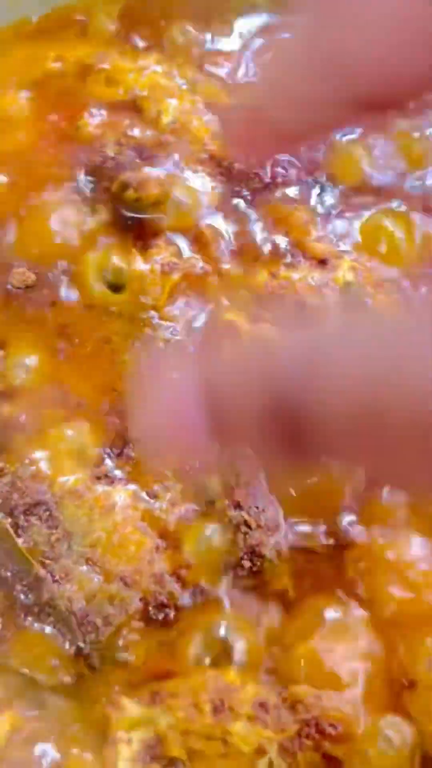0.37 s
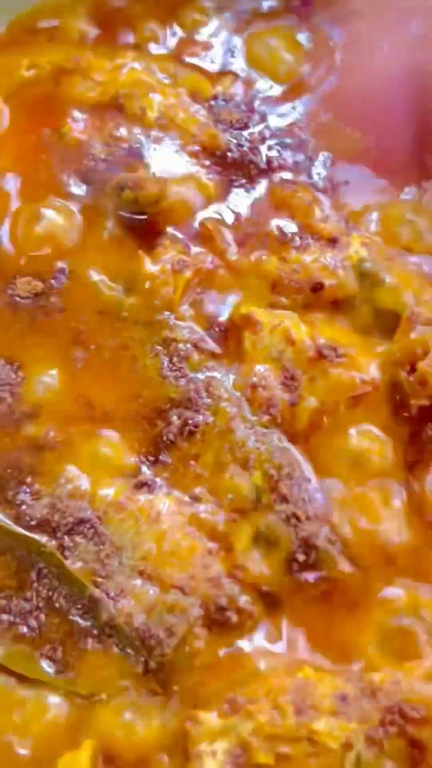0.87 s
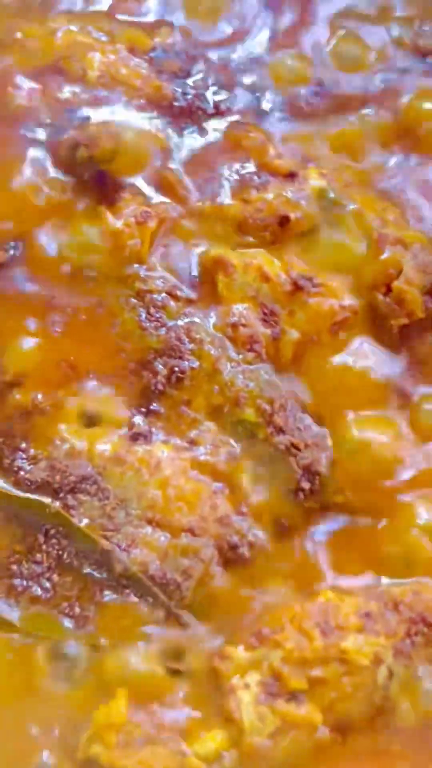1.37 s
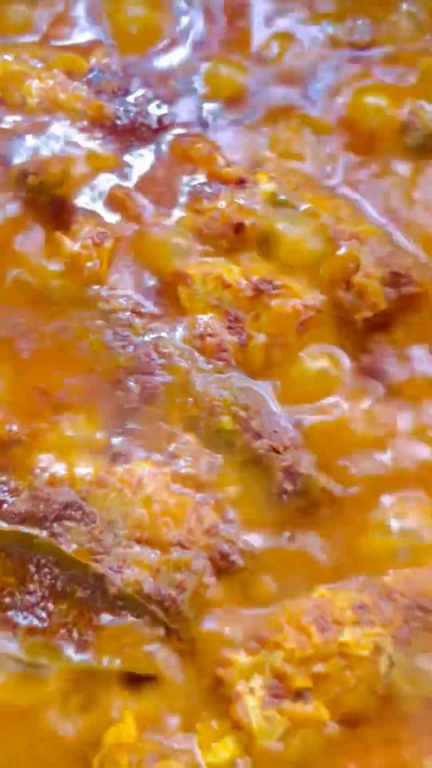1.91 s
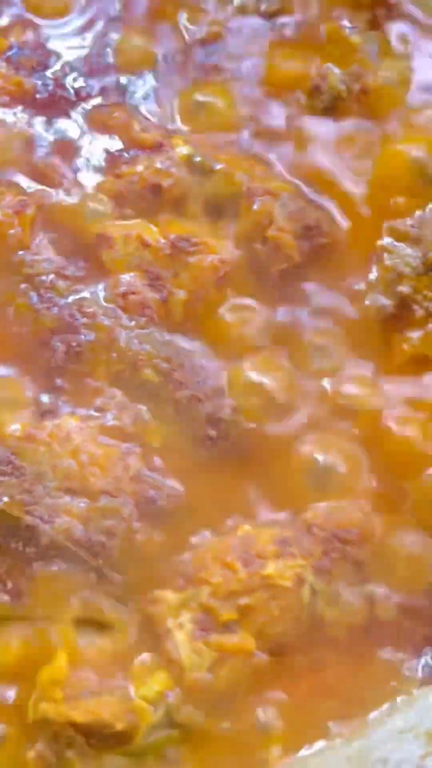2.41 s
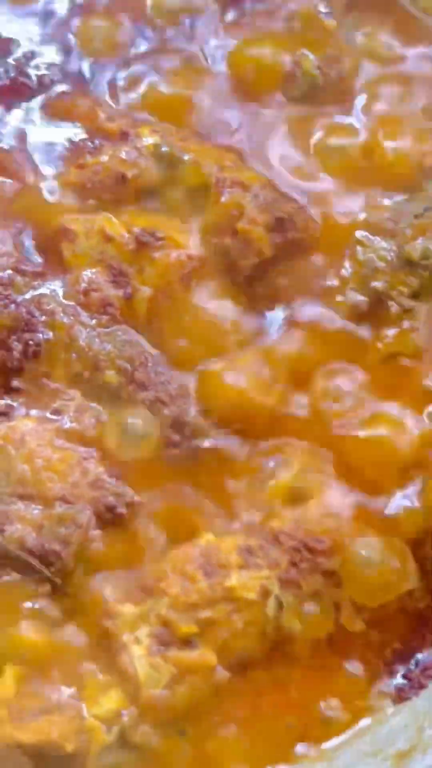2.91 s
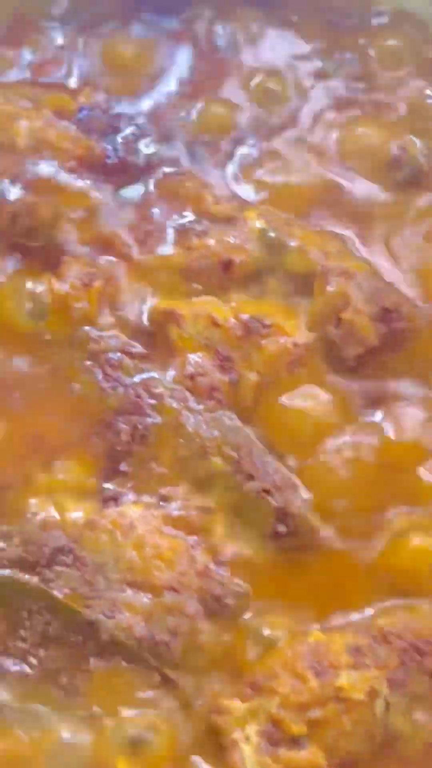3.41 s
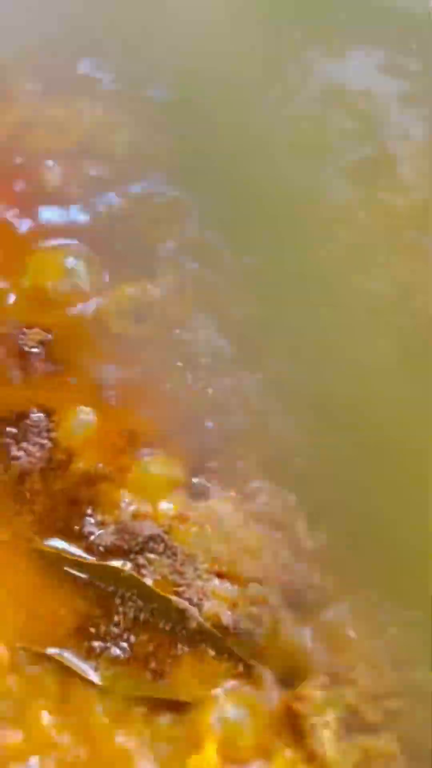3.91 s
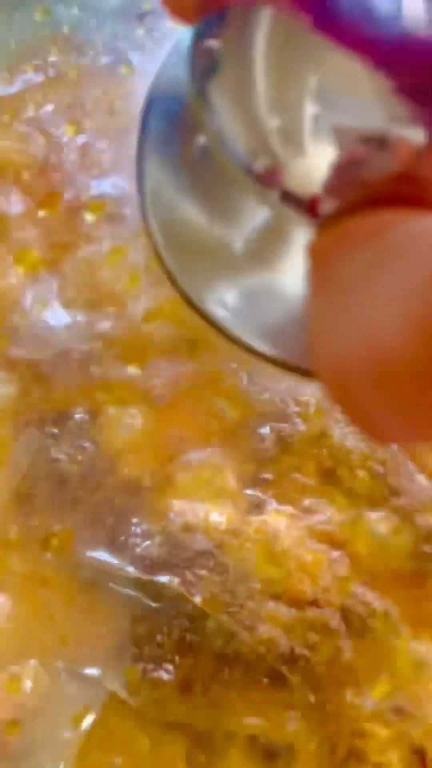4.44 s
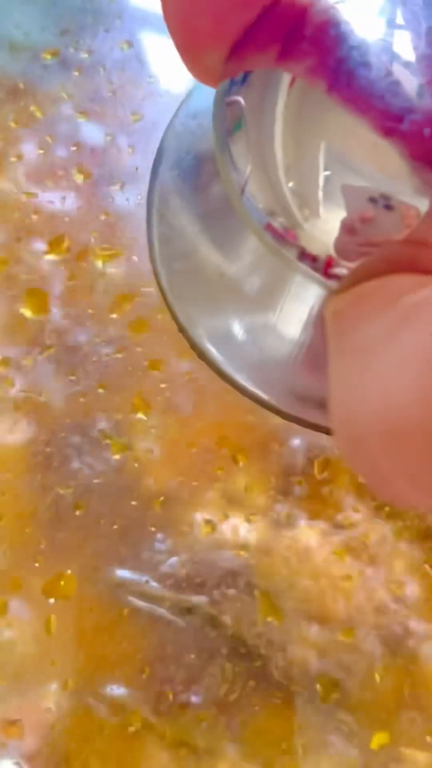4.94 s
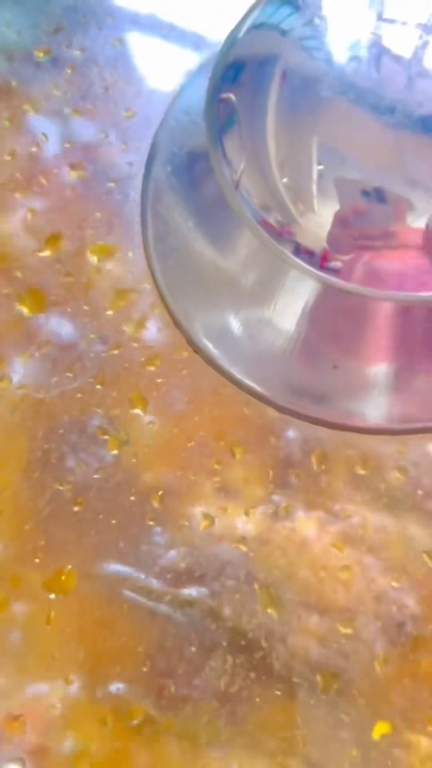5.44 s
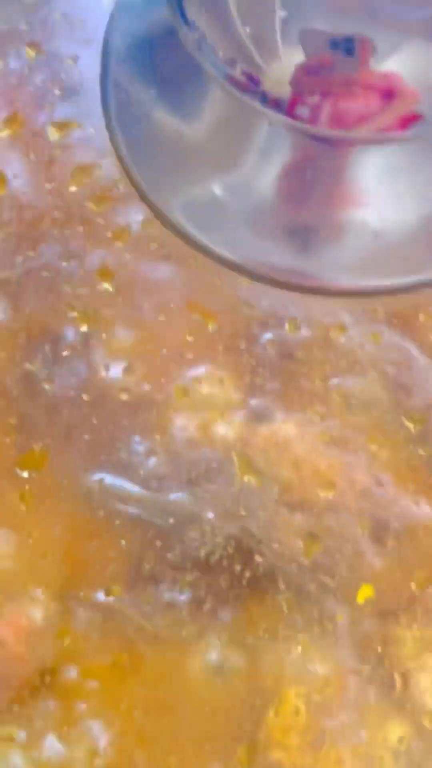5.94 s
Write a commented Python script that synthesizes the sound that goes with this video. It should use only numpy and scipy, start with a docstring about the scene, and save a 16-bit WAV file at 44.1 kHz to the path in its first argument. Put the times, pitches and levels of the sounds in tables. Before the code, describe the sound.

A close, gloopy simmer pops and spits until a lid knocks hard onto the pan, settles, and leaves only soft muffled bubbling.

```python
"""Dense small bubbles, louder pops and low thumps: a thick curry simmers in a pan close under a hand-held phone.
A glass lid knocks the rim hard twice among lighter touches, then seals and muffles the bubbling.
The sound drops out once for a moment. Bubbles are damped tones with rising pitch, thumps sink in pitch,
the lid is a bank of struck modes, and shaped noise makes the air under it, its drone, the rumble and the air."""
import sys
import numpy as np
from scipy import signal
from scipy.fft import rfft, irfft, next_fast_len
from scipy.io import wavfile
from scipy.ndimage import map_coordinates

SR = 44100
rng = np.random.default_rng(int(sys.argv[2]) if len(sys.argv) > 2 else 0)


def store_wav(level_fs):
    """Save 16-bit WAV to argv[1]."""
    pcm = np.round(np.clip(np.atleast_2d(level_fs), -1, 1) * 32767)
    wavfile.write(sys.argv[1], SR, pcm.T.astype(np.int16))


def ratio_of_db(decibels):
    """Turn decibels (scalar or array-like) into linear amplitude factors; 0 dB maps to 1."""
    return 10 ** (np.asarray(decibels, float) / 20)


N = 267676  # samples

LID_DOWN_S, SETTLE_S = 4.1, 0.04  # the lid rests on one side of the rim; it takes this long to come to rest
LID_SHUT_S, SEAL_S = 4.68, 0.29  # it drops flat and seals over this time
HALF = np.array([[.5], [-.5]])  # shares a left-right difference between the two ports


def unit(x):
    """Scale to rms 1."""
    return x / np.sqrt(np.mean(x ** 2) + 1e-20)


def along(points, hz):
    """(Hz, value) points read on a log frequency axis."""
    f, v = np.transpose(points)
    return np.interp(np.log(hz + 1), np.log(f + 1), v)


def wobble(rate):
    """A smooth random curve, rate knots a second."""
    knots = rng.standard_normal(int(N * rate / SR) + 4)
    return map_coordinates(knots, [np.arange(N) * rate / SR])


def filtered(x, response):
    """x times a response of frequency."""
    m = next_fast_len(x.shape[-1] + 8192)
    spectrum = rfft(x, m) * response(np.fft.rfftfreq(m, 1 / SR))
    return irfft(spectrum, m)[..., :x.shape[-1]]


def coloured(x, spectrum):
    """A white signal given a spectrum, at rms 1."""
    return unit(filtered(x, lambda hz: ratio_of_db(along(spectrum, hz))))


def resonance(hz, centre_hz, width_hz):
    """A peak of height 1 that falls to half at the edges of its width."""
    return 1 / (1 + (2 * (hz - centre_hz) / width_hz) ** 2)


def boosted(x, modes):
    """x through narrow boosts: (Hz, width Hz, boost dB)."""
    return filtered(x, lambda hz: ratio_of_db(sum(db * resonance(hz, mode_hz, width) for mode_hz, width, db in modes)))


def bursts(s, size, hz, cycles, rise, attack, order):
    """Damped tones with a soft start whose pitch glides with age: up for a positive rise, else down."""
    t = np.arange(order)[None] / SR
    turns = hz[:, None] * t
    age = turns / np.reshape(cycles, (-1, 1))
    tone = np.sin(2 * np.pi * turns * (1 + np.reshape(rise, (-1, 1)) * age))
    soft_start = (1 - np.exp(-turns / attack)) ** 2
    closing = 1 - (t * SR / order) ** 2  # reaches silence after `order` samples
    shape = np.exp(-age) * soft_start * closing * size[:, None]
    at = (s * SR).astype(int)[:, None] + np.arange(order)
    return np.bincount(at.ravel(), (tone * shape).ravel(), N + SR)[:N]


def decays(t60s, seconds, channels):
    """Noise in which each frequency dies at its own speed, energy 1."""
    hz, t, z = signal.stft(rng.standard_normal((channels, int(seconds * SR))), SR, nperseg=256)
    fall = ratio_of_db(-60 * t / along(t60s, hz)[:, None])
    tail = signal.istft(z * fall, SR, nperseg=256)[1]
    return tail / np.linalg.norm(tail, axis=1, keepdims=True)


def bubbling(count=11000):
    """Many small bubbles of scattered size and pitch burst over a hiss; a second crowd differs between the ports."""
    # Colour of the open pan. Each row: frequency in Hz, relative level in dB.
    open_colour = [(130, -35), (200, 5), (290, -25.5), (340, 0), (420, -8.5), (580, -2), (710, -6.5),
                   (1050, -13), (1360, -5), (1850, -20), (2400, -30), (3300, -32), (4200, -44), (6500, -46),
                   (9500, -62.5), (12000, -110)]
    # Pan walls under the bubbling. Each row: frequency in Hz, width in Hz, boost in dB.
    pan_walls = [(586, 22, 6.5), (705, 6.2, 13), (829.5, 64, 6.5), (991, 14, 11.5), (1360, 260, -1.5)]
    boil_db = -49  # before the lid comes down
    crowds = []
    for _ in range(2):
        when = rng.random(count) * N / SR
        size = ratio_of_db(3.4 * rng.standard_normal(count))
        hz = np.minimum(1300 * np.exp(.75 * rng.standard_normal(count)), 9000)
        crowd = bursts(when, size, hz, cycles=1.2 + hz / 900, rise=.08, attack=.7, order=360)
        hiss = .65 * rng.standard_normal(N)
        crowds.append(unit(crowd) + hiss)
    swell = boil_db + shut_in() + 0.66 * wobble(3.9) + 0.6 * wobble(22)
    return ratio_of_db(swell) * coloured(boosted(np.array(crowds), pan_walls), open_colour)


def shut_in():
    """How much the lid holds back, in dB: a little when it first lands, much once it seals."""
    tilted_db, shut_db = -4.5, -16  # the two add up
    t = np.arange(N) / SR
    landed = np.clip((t - LID_DOWN_S) / SETTLE_S, 0, 1)
    sealed = np.clip((t - LID_SHUT_S) / SEAL_S, 0, 1)
    return tilted_db * landed + shut_db * sealed


def pops():
    """The loudest bubbles, each at its own pitch, small ones chirping most, and short spits."""
    # Spits of fat. Each row: start in seconds, level in dB, pitch in Hz.
    spit_list = [(0.034, -52, 3300), (0.125, -68, 4300), (0.23, -61, 3400), (0.3, -61, 4170),
                 (0.3686, -50, 2500), (0.466, -46, 2550), (0.488, -60, 2500), (0.539, -62, 4000),
                 (0.705, -44, 2000), (0.799, -39, 1690), (0.898, -53, 2870), (0.9203, -53, 2420),
                 (1.221, -53, 2920), (1.363, -50, 3000), (1.366, -62, 4580), (1.66, -65, 3700),
                 (1.734, -55, 2650), (1.775, -59, 3400), (1.9365, -61, 2980), (1.991, -54, 2750),
                 (2.2064, -54, 2800), (2.984, -59, 2340), (2.775, -63, 4200), (3.432, -57, 3100),
                 (3.58, -63, 3900), (3.75, -59, 4300), (4.005, -46.5, 1930), (4.0106, -47, 2520)]
    # Louder bubbles. Each row: start in seconds, level in dB, starting pitch in Hz.
    pop_list = [(0.033, -40.5, 1340), (0.062, -35, 702), (0.108, -39.5, 1360), (0.18, -33, 1455),
                (0.195, -36.5, 524), (0.275, -40, 703), (0.372, -41, 525), (0.485, -37, 1190),
                (0.593, -43, 674), (0.7774, -38, 1520), (0.94, -39, 575), (0.972, -41, 787),
                (1.072, -39, 1250), (1.365, -34, 690), (1.437, -35.5, 480), (1.622, -35.5, 758),
                (1.763, -37.5, 730), (1.778, -42, 1140), (1.938, -35.5, 682), (2.06, -53, 810),
                (2.165, -37, 1190), (2.32, -37.5, 628), (2.4395, -32.5, 1300), (2.5947, -36.5, 1320),
                (2.651, -36.5, 800), (2.774, -37.5, 1194), (2.818, -49, 776), (2.742, -51, 907),
                (2.862, -33.5, 1257), (3.025, -36, 1230), (3.086, -35, 705), (3.11, -40.5, 1405),
                (3.24, -38, 1405), (3.362, -35, 1215), (3.478, -36.5, 788), (3.495, -29, 1605),
                (0.2154, -44, 1490), (0.335, -48, 1500), (0.198, -33.5, 1034), (0.234, -46, 600),
                (0.99, -41, 495), (1.129, -37, 567), (3.052, -36.5, 1412), (3.342, -35.5, 570),
                (3.19, -39, 1440), (3.669, -37, 840), (3.893, -36, 1355), (3.937, -38, 1366),
                (4.262, -36, 593), (4.368, -49, 1680), (4.443, -50, 545), (4.987, -39.5, 500),
                (5.16, -44.5, 1020), (5.218, -49.5, 1030), (5.798, -52, 793)]
    chirp_hz = 1700  # a bubble of this pitch climbs by the full rise, larger ones less
    s, db, hz = np.transpose(spit_list)
    spits = bursts(s, ratio_of_db(db), hz, cycles=2.0, rise=0.03, attack=0.6, order=400)
    s, db, hz = np.transpose(pop_list)
    rise = 0.076 * (hz / chirp_hz) ** 2
    return spits + bursts(s, ratio_of_db(db), hz, cycles=4.5, rise=rise, attack=0.9, order=2400)


def thumps():
    """Low blows that die within a cycle or two, sinking in pitch."""
    # Big blisters or the hand on the phone. Each row: start in seconds, level in dB, starting pitch in Hz.
    thump_list = [(0.233, -31, 120), (0.305, -25.5, 105), (0.748, -31, 112), (1.541, -25, 105),
                  (1.838, -29.5, 100), (2.02, -25.5, 112), (2.186, -29.5, 96.5), (2.392, -21, 107),
                  (2.713, -20, 114), (2.749, -24.5, 127), (2.887, -33.5, 95), (3.113, -29, 108),
                  (3.517, -29.5, 111), (3.967, -20, 121), (4.695, -30.5, 122), (4.789, -26.5, 116),
                  (4.866, -32, 71.5), (4.989, -37, 228), (5.64, -40.5, 71.2), (5.695, -32.5, 95),
                  (5.763, -27, 75), (5.785, -25.5, 90), (5.847, -28.5, 192), (5.857, -27.5, 100),
                  (5.877, -26, 79.4)]
    s, db, hz = np.transpose(thump_list)
    return bursts(s, ratio_of_db(db), hz, cycles=1.0, rise=-0.1, attack=0.3, order=6000)


def ringing_mode(mode, t, decay_share):
    """One mode of glass and pan builds up, decays and flutters in each port, high modes fluttering most."""
    waver_db, waver_rate = 5, 55  # flutter of the loose lid: size, knots per second
    bloom = 0.66  # how fast a mode builds, per cycle
    hz, db, t60, lean_db, lead = mode
    knots = rng.standard_normal((2, waver_rate))
    flutter = np.array([np.interp(t * waver_rate, np.arange(waver_rate), port) for port in knots])
    flutter_db = waver_db * flutter * np.minimum(t / .02, 1) * hz ** 2 / (hz ** 2 + 700 ** 2)
    level = ratio_of_db(db + HALF * lean_db - 60 * t / (decay_share * t60) + flutter_db)
    build = (1 - np.exp(-bloom * hz * t)) ** 2
    return level * build * np.sin(2 * np.pi * hz * t + HALF * lead)


def lid():
    """Each knock: a short contact tone; glass and pan ring most near that pitch; a crack dies in the kitchen."""
    # Lid on rim. Each row: start in seconds, ring in dB, contact tone in dB, contact pitch in Hz,
    # half-width of the excited range in Hz.
    knocks = [(4.0335, -11, -2, 1142, 3600), (4.35, -30.5, -28, 624, 108), (4.474, -42, -32, 2270, 1600),
              (4.4756, -48.5, -30, 1590, 298), (4.4776, -12, -0.5, 501, 128.4),
              (4.49, -39, -24.5, 1223, 120), (4.6, -31, -28, 500, 150), (4.693, -42, -22.5, 348, 505),
              (4.73, -50, -33.5, 1110, 200), (4.787, -42.5, -26, 352, 496)]
    # Modes of lid and pan. Each row: frequency in Hz, relative level in dB, t60 in seconds before the
    # decay share shortens it, left over right in dB, radians by which left leads.
    lid_modes = [(92.5, -7.0, 0.36, 0.2, -0.03), (187.0, -30.0, 0.6, 0.2, -0.01),
                 (221.0, -26.0, 0.3, -0.0, -0.08), (299.0, -4.0, 0.32, -0.8, -0.4),
                 (468.0, -10.0, 0.34, -4.7, -0.9), (520.0, -16, 0.2, 4.7, -0.29),
                 (570.0, -13.0, 0.36, 2.8, -1.25), (634.0, -15.0, 0.45, 0.8, -0.43),
                 (696.0, -13.0, 0.25, -7.8, 0.78), (740.0, -20.0, 0.25, -10.2, 0.23),
                 (781.0, -22.0, 0.35, -0.6, 0.38), (857.0, -14.0, 0.33, -0.7, -0.1),
                 (980.0, 19.5, 0.022, 2, 0.74), (1035.0, -11, 0.27, -4, -2.21),
                 (1105.0, -16, 0.33, 1, -1.28), (1215.0, -19, 0.35, 0, -2.25),
                 (1270.0, -18, 0.33, -7, 0.29), (1300.0, 16.5, 0.026, -4.5, -0.89),
                 (1355.0, -16, 0.3, 0, -1.66), (1400.0, -22, 0.3, -10, -0.74),
                 (1464.0, -16, 0.4, -2, -0.63), (1600.0, -24.0, 0.25, -1.3, -0.37),
                 (1830.0, -4.0, 0.04, -1.8, 0.36), (1890.0, -36.0, 0.4, -0.2, -0.17),
                 (2020.0, -38.0, 0.35, 2.1, -0.1), (2270.0, -34.0, 0.3, 0.6, -0.47),
                 (2290.0, -5, 0.04, 1.9, 0.32), (2325.0, -36, 0.4, -3, 0.13), (2500.0, -43, 0.3, 4, 0.45),
                 (2740.0, -17.0, 0.05, -0.6, 0.24), (3112.0, -38.0, 0.15, -0.7, 0.03),
                 (3370.0, -24.0, 0.05, -0.1, 0.28), (3500.0, -40.0, 0.2, -1.6, 0.22),
                 (3650.0, -25.0, 0.05, 1.7, 0.19), (5200.0, -36.0, 0.05, -0.0, -0.61),
                 (5830.0, -36.0, 0.05, 1.6, -1.14), (6800.0, -42.0, 0.04, -0.0, -1.24)]
    # Noisy part of a knock. Each row: frequency in Hz, relative level in dB.
    crack_colour = [(50, -39.5), (100, -8.5), (300, -7), (390, -19), (600, -14), (1300, -23), (1650, -31.5),
                    (2300, -35.5), (3300, -42.5), (4500, -45.5), (6500, -61.5), (9500, -64), (13000, -91.5),
                    (16000, -110)]
    # Reverberation of the kitchen. Each row: frequency in Hz, t60 in seconds.
    kitchen_decay = [(100, 0.13), (500, 0.67), (1500, 0.55), (3000, 0.33), (5000, 0.23), (10000, 0.22)]
    meet_s, contact_t60_s = 0.0021, 0.026  # the rims take a moment to meet; decay of the contact tone
    tones, cracks = np.zeros((2, N + SR)), np.zeros((2, N + SR))
    t = np.arange(SR * 3 // 5) / SR
    press = (1 - np.exp(-t / meet_s)) ** 3
    mode_array = np.array(lid_modes)
    for s, ring_db, contact_db, spot_hz, width_hz in knocks:
        # once the lid is seated it rings shorter and the rim holds its modes below 400 Hz
        decay_share, held_hz = (0.75, 20) if s < LID_DOWN_S else (0.48, 400)
        ring = np.zeros((2, len(t)))
        for k, mode in enumerate(lid_modes):
            ring += (-1) ** k * ringing_mode(mode, t, decay_share)
        crack = ratio_of_db(-25) * coloured(decays(kitchen_decay, 0.6, channels=2)[:, :len(t)], crack_colour)

        def excited(hz):
            held = (hz / (hz - 1j * held_hz)) ** 3
            return held / (1 + 1j * (hz - spot_hz) / width_hz)

        # the contact tone takes lean and lead from the nearest mode
        lean_db, lead = mode_array[np.argmin(abs(mode_array[:, 0] - spot_hz)), -2:]
        contact_level = press * ratio_of_db(contact_db + HALF * lean_db - 60 * t / contact_t60_s)
        contact = contact_level * np.sin(2 * np.pi * spot_hz * t + HALF * lead)
        strike = press * ratio_of_db(ring_db)
        here = slice(round(s * SR), round(s * SR) + len(t))
        tones[:, here] += filtered(strike * ring, excited) + contact
        cracks[:, here] += filtered(strike * crack, excited)
    return tones[:, :N], cracks[:, :N]


def gap():
    """Air under the closing lid: a narrow band of noise whose pitch sinks as the opening narrows."""
    # Path of the air resonance. Each row: time in seconds, pitch in Hz, level in dB.
    gap_path = [(4.121, 758.6, -57.5), (4.22, 720, -57), (4.3, 677, -58.5), (4.359, 613, -46.5),
                (4.438, 560, -52), (4.551, 442.5, -41), (4.621, 380.2, -53), (4.701, 338.4, -56),
                (4.8, 270.7, -54.5), (4.919, 199, -57)]
    width_hz = 110
    t = np.arange(N) / SR
    s, hz, db = np.transpose(gap_path)
    slow = filtered(rng.standard_normal((4, N)), lambda f: resonance(f, 0, width_hz))
    turn = 2 * np.pi * np.cumsum(np.interp(t, s, hz)) / SR
    band = unit(slow[:2] * np.cos(turn) + slow[2:] * np.sin(turn))
    return ratio_of_db(np.interp(t, s, db, -120, -120)) * band


def hum():
    """The seated lid, shaken by the boil, drones as two narrow bands of noise that slowly fade."""
    # Low modes of the seated lid. Each row: frequency in Hz, width in Hz, level in dB before the fade.
    hum_modes = [(90, 11, -49.5), (196, 54, -49.5)]
    fade_db_per_s = 6
    since = np.arange(N) / SR - LID_DOWN_S
    drone = np.zeros((2, N))
    for mode_hz, width, db in hum_modes:
        noise = rng.standard_normal((2, N))
        drone += ratio_of_db(db) * unit(filtered(noise, lambda hz: resonance(hz, mode_hz, width)))
    return np.clip(since / SETTLE_S, 0, 1) * ratio_of_db(-fade_db_per_s * since) * drone


def background():
    """A lumpy burner and room rumble that eases under the sealed lid, and steady muffled simmer and air."""
    # Muffled simmer and kitchen air. Each row: frequency in Hz, relative level in dB.
    covered_colour = [(130, -29), (200, -1), (330, -6.5), (410, -8), (520, -6.5), (690, -11.5), (930, -18),
                      (1080, -18), (1220, -25.5), (1330, -24), (1550, -27.5), (1950, -26), (2400, -35),
                      (3500, -47), (5000, -54), (7000, -58), (9600, -63), (12000, -110)]
    # Rumble. Each row: frequency in Hz, relative level in dB.
    low_colour = [(12, -63.5), (20, -21), (36, 2.5), (48, 9.5), (97, 5.5), (118, -1), (152, -1.5),
                  (178, 5.5), (242, -17.5), (300, -37.5), (390, -49.5), (660, -120)]
    # Glass modes that let the simmer through. Each row: frequency in Hz, width in Hz, boost in dB.
    glass_modes = [(1050, 10, 10), (1690, 48, 7)]
    covered_db, rumble_db, shut_rumble_db = -52.5, -50, -1.5
    sealed = np.clip((np.arange(N) / SR - LID_SHUT_S) / SEAL_S, 0, 1)
    lumps = ratio_of_db(rumble_db + shut_rumble_db * sealed - 1.6 * wobble(2) + 1.7 * wobble(9))
    simmer = coloured(boosted(rng.standard_normal((2, N)), glass_modes), covered_colour)
    air = ratio_of_db(covered_db + .8 * wobble(14)) * simmer
    return air + lumps * coloured(rng.standard_normal((2, N)), low_colour)


def scene():
    """Mix the sources: row 0 is what both ports share, row 1 what differs; then spread them to left and right."""
    # Likeness of the two ports. Each row: frequency in Hz, left-right likeness (1 = identical).
    likeness = [(120, .998), (220, .98), (340, .85), (530, .72), (830, .5), (1280, .25), (1600, .45),
                (2000, .93), (2400, .96), (3800, .98), (5200, .8), (9000, .6)]
    loud = pops()
    echo_tail = decays([(500, 0.13), (3000, 0.13)], 0.19, channels=2)
    echo = signal.fftconvolve(loud[None], echo_tail, axes=1)[:, :N]
    near = [[1], [0]] * (loud + thumps()) + [[.4], [.9]] * echo
    tones, cracks = lid()
    shared, differing = bubbling() + background() + near + cracks + gap() + hum()

    def turn(hz):
        return np.arccos(np.clip(along(likeness, hz), -1, 1)) / 2

    mid = filtered(shared, lambda hz: np.cos(turn(hz)))
    side = filtered(differing, lambda hz: np.sin(turn(hz)))
    return np.array([mid + side, mid - side]) + tones  # lid tones carry their own lean and lead


def top_cut(x):
    """Nothing passes above the cut-off."""
    return signal.sosfilt(signal.butter(12, 13500, fs=SR, output="sos"), x)


def record(dry):
    """The microphone pair leans left or right with frequency; the sound is cut for an instant."""
    # Balance of the pair. Each row: frequency in Hz, left over right in dB.
    lean = [(250, 0), (360, .5), (510, 2), (730, 4.5), (1050, -1), (1500, -6), (2140, -2), (3060, 0)]
    # Phase of the pair. Each row: frequency in Hz, radians by which left leads.
    lead = [(500, 0), (780, -.2), (1120, .5), (1550, .9), (1850, .2), (2200, 0)]
    # Start and end of the dropout, in seconds.
    dropout = (2.3535, 2.4009)
    pair = filtered(dry, lambda hz: ratio_of_db(HALF * along(lean, hz)) * np.exp(1j * HALF * along(lead, hz)))
    t = np.arange(N) / SR
    since = np.clip(t - dropout[0], 0, 1)
    fade = np.exp(-since / .0005) + ratio_of_db(-33 - 900 * since)  # a quick fade, a faint trail
    gate = np.where((since > 0) & (t < dropout[1]), fade, 1)
    return top_cut(pair * gate)


dry = scene()
out = record(dry)
store_wav(out)
```